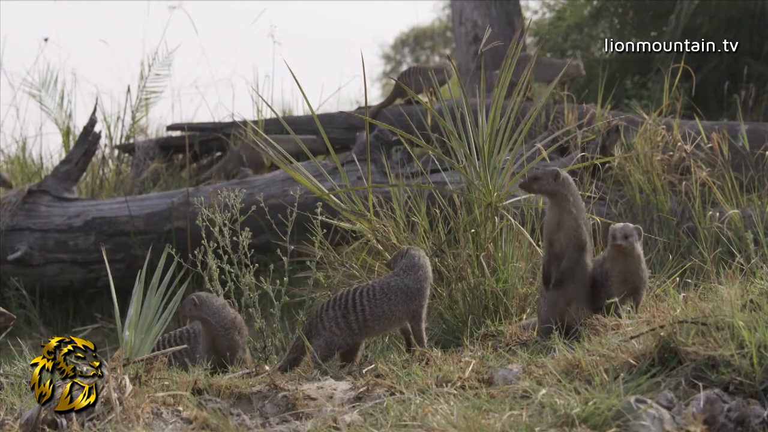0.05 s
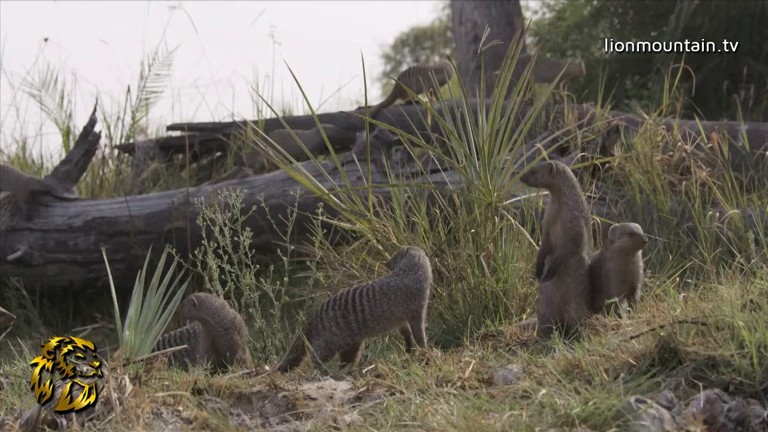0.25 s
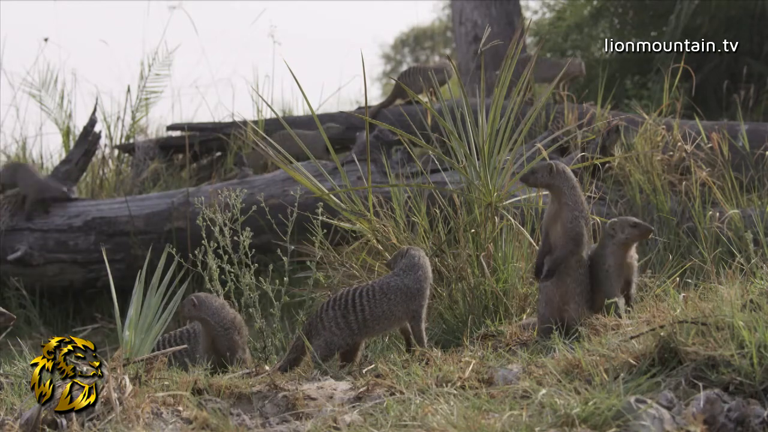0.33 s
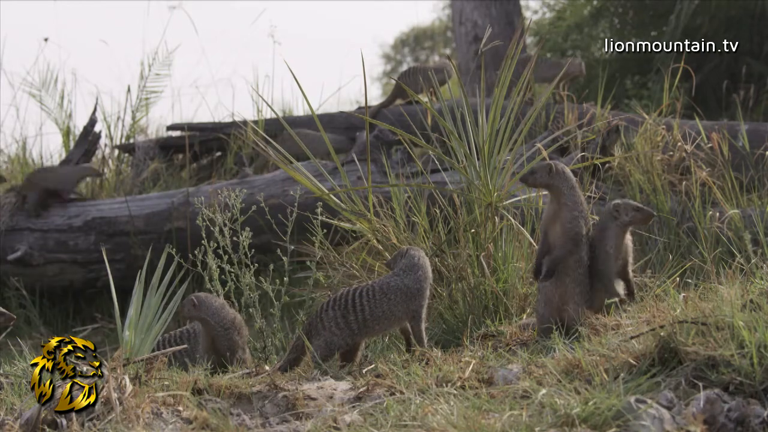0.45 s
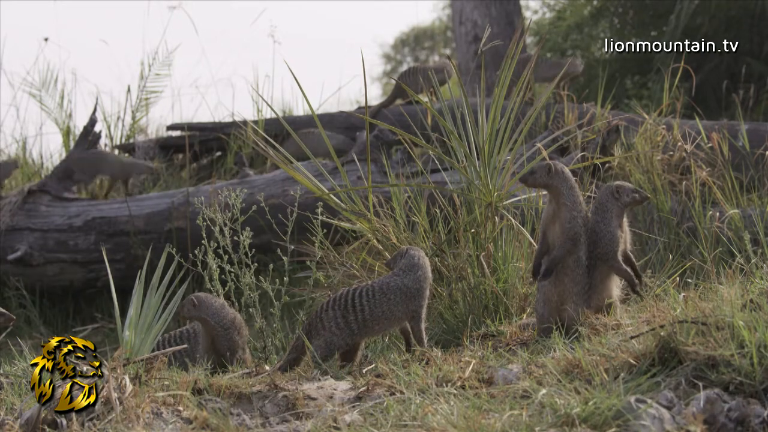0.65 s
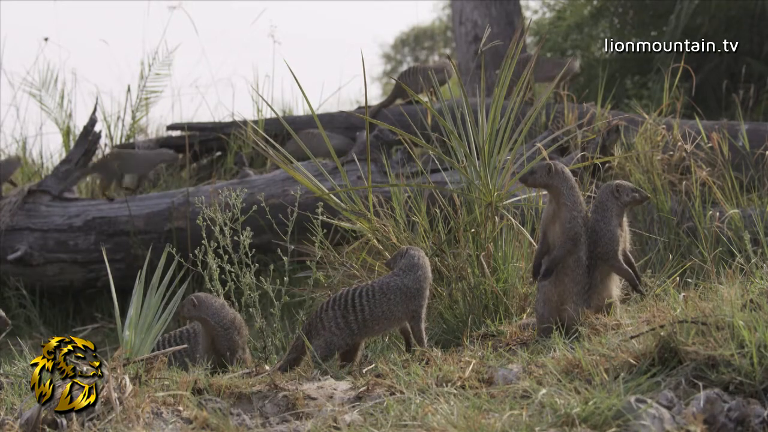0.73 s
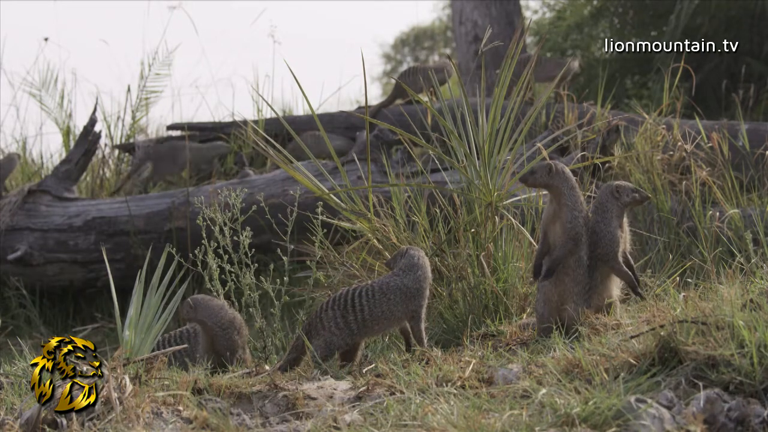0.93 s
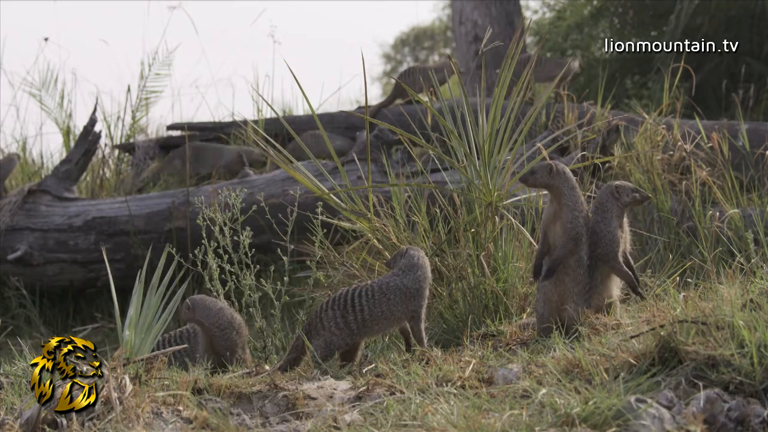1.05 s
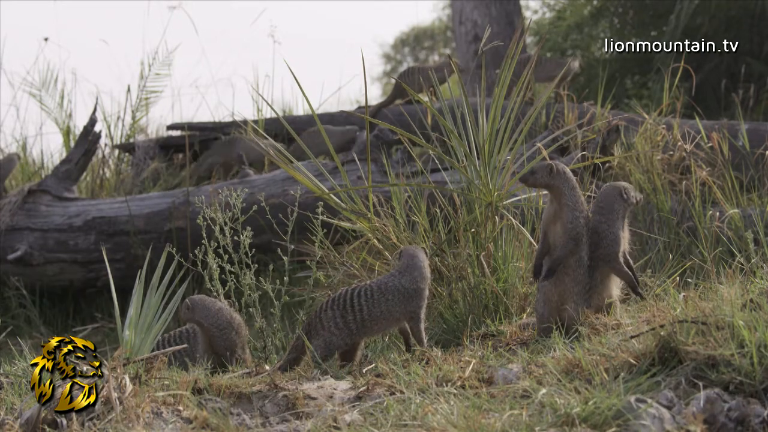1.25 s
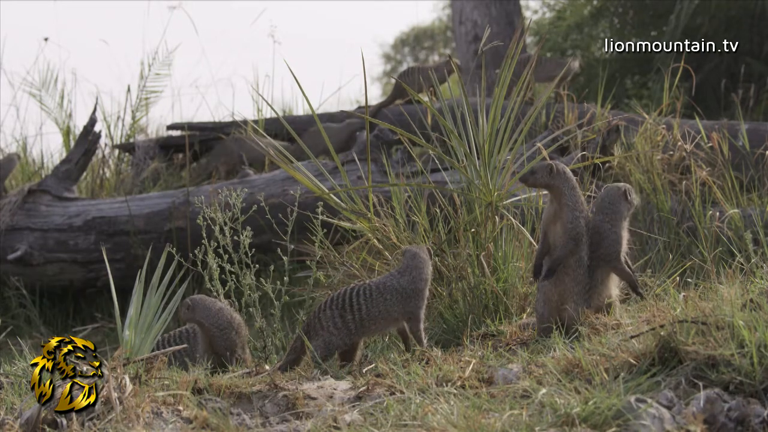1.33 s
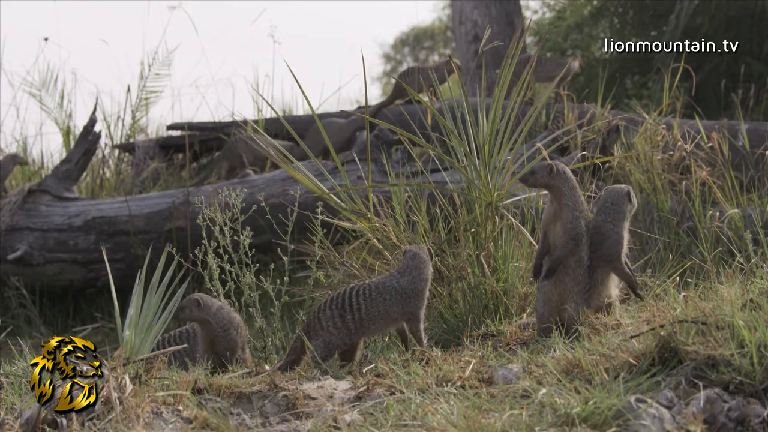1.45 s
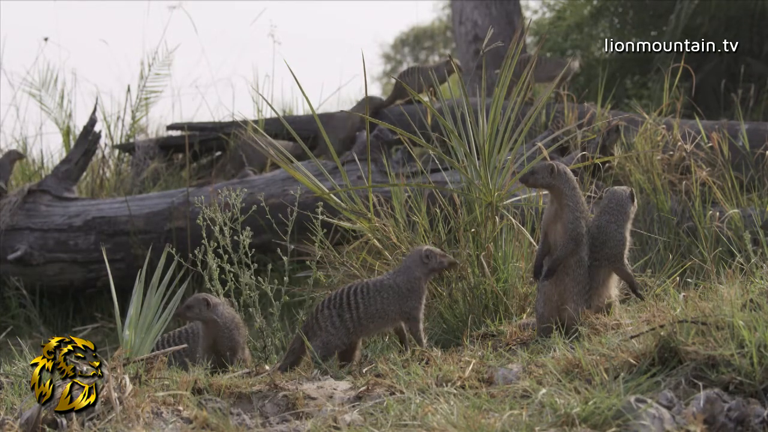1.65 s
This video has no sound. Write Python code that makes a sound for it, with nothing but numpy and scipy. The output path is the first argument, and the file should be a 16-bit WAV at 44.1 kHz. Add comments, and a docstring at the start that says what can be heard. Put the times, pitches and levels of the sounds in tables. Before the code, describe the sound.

On open grassland, nearby mongooses chirp separately at first, then squeak and grunt together in a quick flurry. Dry stalks crackle lightly under their feet, with faint high bird whistles and soft air behind.

```python
"""Dry grassland: a troop of banded mongooses calls with sharp falling chirps, a round toot, low rising
grunts and overlapping squeals, each a few harmonics on an unsteady pitch. Feet snap stalks, brush the
grass and thud softly. Thin high warbles, insect hiss, a low rush of air and a fading rumble lie behind.
Near stems, a fallen log and bushes return a faint scatter."""
import sys
import numpy as np
from scipy import signal
from scipy.fft import rfft, irfft, next_fast_len
from scipy.io import wavfile
from scipy.ndimage import uniform_filter1d, map_coordinates

SR = 44100
rng = np.random.default_rng(int(sys.argv[2]) if len(sys.argv) > 2 else 0)


def int16_out(signal):
    """Quantize to a 16-bit WAV file."""
    q = np.round(np.clip(np.atleast_2d(signal).T, -1, 1) * 32767)
    wavfile.write(sys.argv[1], SR, q.astype(np.int16))


N = 74970
T = np.arange(N) / SR
THIRD_DB, FOURTH_DB = -25.5, -35  # harmonics re the octave
JITTER_PER_S = 500
# Spectrum of rustling grass. Each row: frequency in Hz, gain in dB.
GRASS_SPECTRUM = [(50, -35), (300, 0.5), (1000, 2), (2500, 2.5), (5000, 1), (8000, 0), (11000, -31),
                  (16000, -10.5)]


def squeaks():
    """Whistled calls whose weight shifts between the fundamental and its octave."""
    # Two falling chirps, rising squeak, falling squeal, level squeal, toot, thin whistle over the toot.
    # One contour a call. Each row: time in seconds, pitch in Hz, fundamental in dB, octave in dB.
    calls = [
        [(.2175, 4280, -46, -36), (.221, 4350, -30, -20.5), (.227, 4460, -32, -22), (.233, 4300, -27, -18.5),
         (.2362, 3900, -17, -33), (.238, 3520, -14.5, -42), (.2458, 3374, -13, -25), (.2482, 3250, -15.5, -27),
         (.2505, 3080, -32, -50), (.255, 2750, -29, -75)],
        [(.545, 4580, -40, -58), (.5495, 4425, -25.5, -53), (.556, 4270, -28.5, -45),
         (.564, 4560, -35.5, -34.5), (.570, 4380, -31, -47), (.576, 3830, -40, -45), (.583, 3250, -44, -80)],
        [(1.170, 2445, -83, -68), (1.181, 2640, -62, -40), (1.189, 2930, -43, -26.5), (1.194, 3180, -48, -33.5),
         (1.201, 3370, -46, -56)],
        [(1.198, 4150, -37, -42), (1.210, 4713, -44.5, -50), (1.218, 4580, -45, -51), (1.229, 4090, -33.5, -40),
         (1.238, 4256, -32, -44.5), (1.247, 3806, -31.5, -42), (1.254, 3671, -29, -45),
         (1.261, 3850, -27.5, -59), (1.265, 3210, -35, -47), (1.270, 2970, -33, -24.5),
         (1.275, 2770, -36.5, -37.5), (1.281, 2165, -48.5, -57), (1.290, 1380, -31.5, -50)],
        [(1.309, 2800, -47, -66), (1.316, 2960, -38.5, -74), (1.323, 3040, -51, -65), (1.330, 3550, -50, -42),
         (1.338, 2807, -47, -55), (1.345, 2690, -32, -63), (1.352, 2938, -41, -49), (1.360, 2860, -26.5, -46.5),
         (1.369, 2738, -32, -53), (1.377, 2860, -30, -49), (1.400, 2708, -31, -61), (1.414, 2948, -33.5, -47.5),
         (1.427, 2792, -28, -54), (1.444, 2693, -29, -50), (1.4555, 2515, -30, -76)],
        [(.414, 1280, -45, -71), (.420, 1202, -29, -56), (.429, 1130, -25.5, -48), (.440, 1138, -24, -57),
         (.451, 1186, -27, -49), (.4545, 1137, -23.5, -55), (.4585, 1120, -57, -68)],
        [(.420, 5930, -55, -80), (.428, 6310, -34.5, -76), (.434, 6700, -57, -80), (.441, 6060, -47, -76),
         (.448, 5940, -56, -80)],
    ]
    # Harsh end of the falling squeal. Each row: time in seconds, pitch in Hz, third harmonic in dB.
    squeal_end = [(1.265, 3165, -67), (1.271, 2906, -29.5), (1.277, 2500, -37.5), (1.281, 2110, -32.5),
                  (1.286, 1760, -56)]
    out = np.zeros(N)
    for rows in calls:
        gate, pitch_hz, first_db, octave_db = contour(rows)
        partials = [(1, first_db), (2, octave_db), (3, octave_db + THIRD_DB), (4, octave_db + FOURTH_DB)]
        out += gate * voice(pitch_hz, partials)
    gate, pitch_hz, third_db = contour(squeal_end)
    return out + gate * voice(pitch_hz, [(3, third_db), (4, third_db - 12)])


def grunts_and_peeps():
    """Short notes that glide, brighten as they swell, and break off."""
    # Each row: start in seconds, length in seconds, first and last pitch in Hz, crest level in dB,
    # swell in dB, octave in dB re the fundamental at the crest.
    notes = [(0.127, 0.025, 775, 845, -48, 4, -35), (0.697, 0.019, 2430, 2350, -53, 2, -23),
             (0.892, 0.03, 2747, 2577, -41.5, 8, -18), (0.992, 0.062, 743, 870, -37, 10, -12),
             (1.165, 0.039, 978, 1056, -41.5, 8, -37), (1.204, 0.065, 763.6, 838, -24.5, 11.5, -8.5),
             (1.224, 0.053, 588, 680, -48, -0.5, -10), (1.235, 0.027, 2880, 2980, -41, 8, -3),
             (1.273, 0.03, 2860, 2550, -40, 11, -19), (1.373, 0.04, 575, 698, -45.5, 6.5, -36)]
    crest_fraction, fall_db, brightening = 0.87, 18, 0.42
    out = np.zeros(N)
    for start_s, length_s, first_hz, last_hz, crest_db, swell_db, octave_re_db in notes:
        gate, = contour([(start_s,), (start_s + length_s,)])
        progress = np.clip((T - start_s) / length_s, 0, 1)
        pitch_hz = first_hz + (last_hz - first_hz) * progress ** 1.48  # glides mostly late
        drop_db = np.interp(progress, [0, crest_fraction, 1], [swell_db, 0, fall_db])
        first_db = crest_db - drop_db
        octave_db = first_db + octave_re_db - brightening * drop_db
        out += gate * voice(pitch_hz, [(1, first_db), (2, octave_db), (3, octave_db + THIRD_DB)])
    return out


def voice(pitch_hz, partials):
    """Harmonics (number, rms dB) with jitter and a faint rasp; ragged while the pitch dives."""
    jitter, shimmer_db, rasp_db = .003, .45, -27
    flutter_db, full_dive_hz_per_s = 2.5, 110000
    phase = 2 * np.pi * np.cumsum(pitch_hz * (1 + jitter * wobble(JITTER_PER_S))) / SR
    phase += amp(rasp_db) * wobble(2600) * pitch_hz / 4000  # noisy skirt, stronger on high notes
    tone = sum(amp(db) * np.sin(k * phase) * (k * pitch_hz < SR / 2) for k, db in partials)
    dive = np.clip(-np.gradient(pitch_hz) * SR / full_dive_hz_per_s, 0, 1)
    return np.sqrt(2) * tone * amp(shimmer_db * wobble(JITTER_PER_S) + dive * flutter_db * wobble(900))


def mongooses():
    """All calls, with their top rolled off by the throat."""
    # Each row: frequency in Hz, gain in dB.
    throat = [(500, 1.5), (8800, -0.5), (10500, -1.5), (12000, -17), (15000, -24)]
    return filtered(squeaks() + grunts_and_peeps(), lambda hz: amp(along(throat, hz)))


def stalk_snaps():
    """Dry stalks snap in brief bursts of band-limited noise; the 13 kHz tick at 0.2357 s is instead a crack in
    the first chirp's voice as it breaks register."""
    # Each row: start in seconds, peak in dB, centre in Hz, Gaussian width in octaves.
    snaps = [(0.1158, -27.5, 3770, 0.88), (.2357, -30.5, 13000, 0.55), (0.661, -40.5, 3220, 0.5),
             (.7505, -32, 5280, 0.78), (0.8138, -34.5, 3200, 1.3), (0.8996, -32.5, 4000, 1.2),
             (0.9279, -28.5, 4500, 1.4), (0.9305, -36, 780, 0.66), (0.9324, -20, 6260, 1),
             (1.085, -32.5, 7000, 0.15), (1.208, -30.5, 5000, 0.66), (1.437, -38, 3910, 0.73),
             (0.492, -35, 6500, 1), (1.506, -36, 5000, 0.84)]
    t60_s = 0.0052
    out = np.zeros(N)
    for start_s, peak_db, centre_hz, width_oct in snaps:
        burst = rng.standard_normal(N) * (T >= start_s) * amp(-60 * np.abs(T - start_s) / t60_s)
        tick = filtered(burst, lambda hz: np.exp(-.5 * (np.log2((hz + 1) / centre_hz) / width_oct) ** 2))
        out += amp(peak_db) * tick / np.abs(tick).max()
    return out


def rustles():
    """Feet brush the grass and dry blades crinkle: short swells of rough noise."""
    # Each row of both: centre in seconds, length in seconds, level in dB.
    brushes = [(0.023, 0.16, -51), (0.165, 0.0074, -45.5), (0.225, 0.014, -41.5), (0.368, 0.011, -42.5),
               (0.498, 0.013, -54), (0.797, 0.04, -47), (1.002, 0.023, -47.5), (1.147, 0.021, -49.5),
               (1.273, 0.045, -44), (1.423, 0.024, -46.5)]
    crinkles = [(0.232, .012, -50), (.882, .01, -56), (1.115, .018, -53), (1.208, .009, -54),
                (1.48, .015, -60), (1.571, .008, -57), (1.66, .009, -57)]
    # Each row: frequency in Hz, gain in dB.
    blade_spectrum = [(6000, -24), (10500, 3), (13000, -2), (16000, -7.5)]

    def swells(rows, spectrum, rough_db, rough_per_s):
        envelope = sum(amp(db) * np.exp(-2 * ((T - s) / length_s) ** 2) for s, length_s, db in rows)
        noise = rng.standard_normal(N) * amp(rough_db * wobble(rough_per_s))
        return envelope * coloured(noise, spectrum)

    brushing = swells(brushes, GRASS_SPECTRUM, rough_db=3, rough_per_s=700)
    return brushing + swells(crinkles, blade_spectrum, rough_db=4, rough_per_s=990)


def litter():
    """Ground litter rustles faintly: hiss plus sparse crackling grains."""
    # Each row: time in seconds, level in dB.
    levels = [(0, -63), (.25, -57), (.33, -61), (.6, -54), (.7, -60.5), (.82, -60.5), (1.08, -60.5),
              (1.3, -55.5), (1.48, -56), (1.53, -74), (1.7, -68)]
    grains_per_s, crackle_db = 220, -1.5
    grains = (rng.random(N) < grains_per_s / SR) * rng.standard_normal(N)
    hiss = coloured(rng.standard_normal(N), GRASS_SPECTRUM)
    crackle = amp(crackle_db) * coloured(grains, GRASS_SPECTRUM)
    return amp(np.interp(T, *np.transpose(levels))) * (hiss + crackle)


def footfalls():
    """Soft thuds: low damped sines that sink in pitch."""
    # Each row: start in seconds, initial pitch in Hz, level in dB from which the decay starts.
    thuds = [(0.928, 114, -39.5), (1.057, 131, -36.5), (1.206, 109, -42.5), (1.567, 115, -53)]
    t60_s, rise_s, sag_s = 0.12, 0.0072, 0.095
    out = np.zeros(N)
    for start_s, hz, db in thuds:
        age_s = np.maximum(T - start_s, 0)
        envelope = amp(db - 60 * age_s / t60_s) * (1 - np.exp(-age_s / rise_s))
        phase = 2 * np.pi * hz * sag_s * (1 - np.exp(-age_s / sag_s))
        out += envelope * np.sin(phase)
    return out


def scatter(x):
    """Near stems answer at once; the log and bushes add a short diffuse tail, mostly to high calls."""
    # Decay of the tail. Each row: frequency in Hz, T60 in seconds.
    tail_t60 = [(1200, 0.16), (3000, 0.11), (5700, 0.18), (9000, 0.1)]
    # Colour of both echoes. Each row: frequency in Hz, gain in dB.
    echo_tone = [(1150, 4), (2500, 7.5), (5000, 8.5), (9000, -0.5)]
    far_db, near_db = -24, -23  # ahead of echo_tone
    near_t60_s, blur_db, blur_hz = 0.013, -7, 1800
    bins_hz, frames_s, spectra = signal.stft(rng.standard_normal(SR // 2), SR, nperseg=256)
    decay = amp(-60 * frames_s / along(tail_t60, bins_hz)[:, None])
    far_ir = signal.istft(spectra * decay, SR, nperseg=256)[1]
    near_ir = rng.standard_normal(len(far_ir)) * amp(-60 * T[:len(far_ir)] / near_t60_s)
    blur = amp(blur_db) * wobble(blur_hz) * high_pass(x, blur_hz)  # smears the treble in pitch
    far = amp(far_db) * signal.fftconvolve(x + blur, far_ir / np.linalg.norm(far_ir))
    near = amp(near_db) * signal.fftconvolve(x, near_ir / np.linalg.norm(near_ir))
    return filtered((far + near)[:N], lambda hz: amp(along(echo_tone, hz)))


def warbles():
    """Distant high falling whistles, perhaps birds, with flicker and a dying vibrato."""
    # One contour a whistle. Each row: time in seconds, pitch in Hz, level in dB.
    whistles = [
        [(0, 7000, -48.5), (.065, 7000, -51.5), (.105, 6570, -53), (.155, 5940, -63), (.185, 5320, -58.5),
         (.205, 4700, -62)],
        [(.349, 10050, -53), (.385, 10740, -57), (.405, 9550, -51), (.44, 9240, -56), (.465, 8750, -61)],
    ]
    # One vibrato rate a whistle.
    vibrato_hz = [37.4, 49]
    depth, vibrato_decay_s, jitter, flicker_db, octave_db = 0.049, 0.2, .012, 3, -5
    out = np.zeros(N)
    for rows, rate_hz in zip(whistles, vibrato_hz):
        gate, pitch_hz, level_db = contour(rows)
        age_s = np.maximum(T - rows[0][0], 0)
        vibrato = depth * np.exp(-age_s / vibrato_decay_s) * np.sin(2 * np.pi * rate_hz * age_s)
        level_db += flicker_db * wobble(160)
        pitch_hz *= 1 + vibrato + jitter * wobble(JITTER_PER_S)
        out += gate * voice(pitch_hz, [(1, level_db), (2, level_db + octave_db)])
    return out


def air():
    """A low, nearly steady rush of air."""
    # Each row: frequency in Hz, gain in dB.
    spectrum = [(35, -53), (60, -10), (196, -2), (231, -3.5), (253, -4), (359, -6), (385, -7), (521, -11.5),
                (849, -15.5), (1380, -21.5), (2010, -24), (2360, -23), (6260, -50), (8280, -22.5),
                (15500, -38)]
    rush = amp(-49 + .3 * wobble(7.44)) * coloured(rng.standard_normal(N), spectrum)
    return high_pass(rush, corner_hz=80.4)


def insects():
    """A band of insect hiss near 8 kHz."""
    # Each row: frequency in Hz, gain in dB.
    spectrum = [(6500, -15.5), (7600, -4), (8300, 1), (9000, -3.5), (10200, -19), (12000, -42)]
    return amp(-54 + .4 * wobble(19)) * coloured(rng.standard_normal(N), spectrum)


def rumble():
    """Deep noise that fades out early."""
    # Each row: frequency in Hz, gain in dB.
    spectrum = [(10, -28), (25, 2.5), (48, -7.5), (65, -14), (120, -35)]
    # Each row: time in seconds, level in dB.
    levels = [(0, -47.5), (.25, -53), (.42, -61), (.6, -95)]
    return amp(np.interp(T, *np.transpose(levels))) * coloured(rng.standard_normal(N), spectrum)


def amp(db):
    """Decibels to gain."""
    return 10 ** (np.asarray(db) / 20)


def along(points, hz):
    """Interpolate (Hz, value) points on a log frequency axis."""
    knots_hz, values = np.transpose(points)
    return np.interp(np.log(hz + 1), np.log(knots_hz + 1), values)


def contour(rows, edge_s=.003):
    """An on-off gate, then one smoothed curve for each column after the time."""
    times_s, *columns = np.transpose(rows)
    times_s = np.sort(times_s)
    ramp = np.clip(np.minimum(T - times_s[0], times_s[-1] - T) / edge_s, 0, 1)
    curves = [uniform_filter1d(np.interp(T, times_s, column), size=90) for column in columns]
    return [np.sin(ramp * np.pi / 2)] + curves


def wobble(knots_per_s):
    """A smooth random curve."""
    return map_coordinates(rng.standard_normal(4000), [T * knots_per_s], mode="wrap")


def filtered(x, response):
    """Apply a gain given as a function of Hz."""
    size = next_fast_len(N + SR // 2)
    return irfft(rfft(x, size) * response(np.fft.rfftfreq(size, 1 / SR)), size)[:N]


def high_pass(x, corner_hz):
    """Steep low cut."""
    return filtered(x, lambda hz: 1 - 1 / (1 + (hz / corner_hz) ** 10))


def coloured(x, spectrum):
    """x shaped by (Hz, dB) points, at rms 1."""
    shaped = filtered(x, lambda hz: amp(along(spectrum, hz)))
    return shaped / np.sqrt(np.mean(shaped ** 2) + 1e-20)


def scene():
    """Calls and footsteps with their scatter, over the background."""
    troop = mongooses() + stalk_snaps() + rustles() + litter() + footfalls()
    return (troop + scatter(troop) + warbles() + air() + insects() + rumble())[None]


def record(dry):
    """Brick-wall band limit."""
    return filtered(dry[0], lambda hz: hz < 15850)[None]


dry = scene()
out = record(dry)
int16_out(out)
```